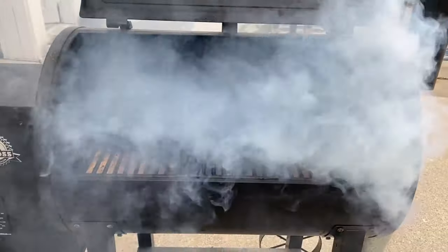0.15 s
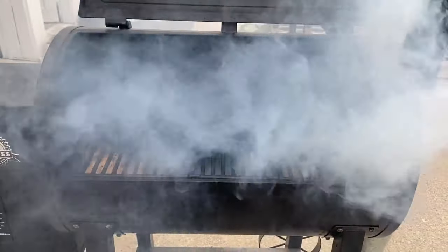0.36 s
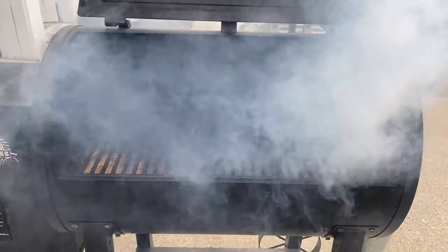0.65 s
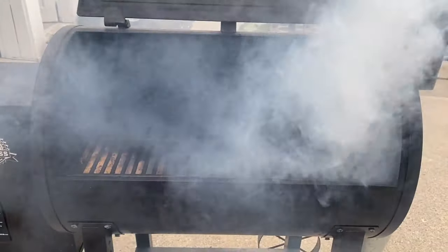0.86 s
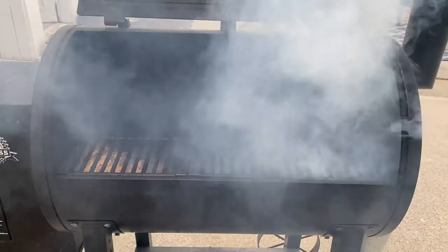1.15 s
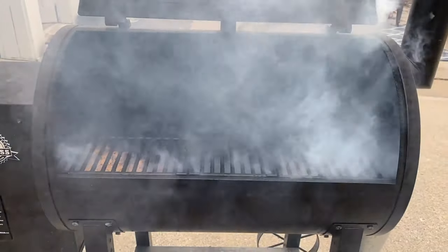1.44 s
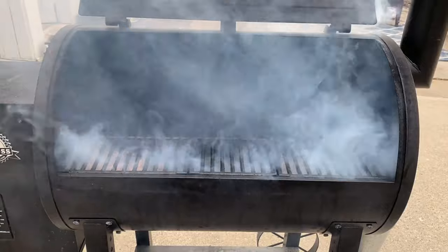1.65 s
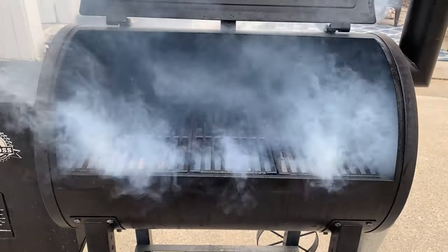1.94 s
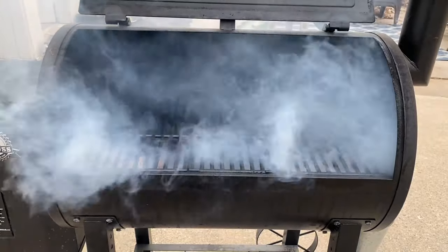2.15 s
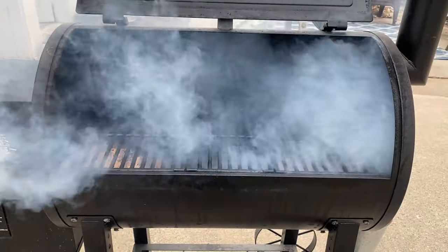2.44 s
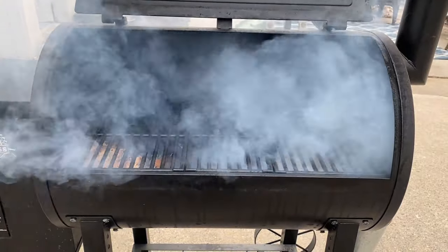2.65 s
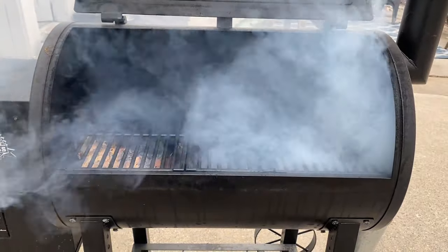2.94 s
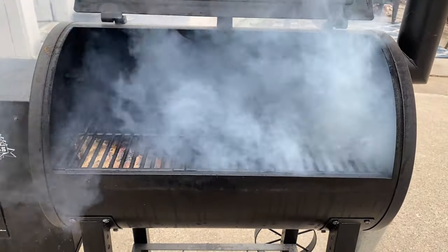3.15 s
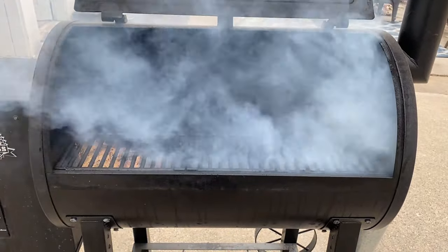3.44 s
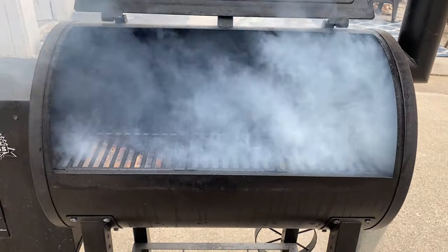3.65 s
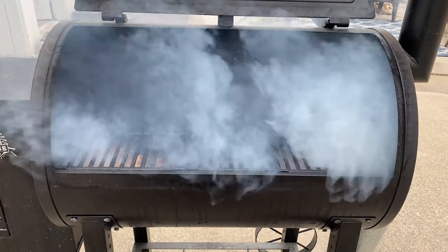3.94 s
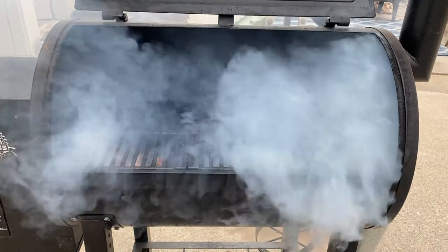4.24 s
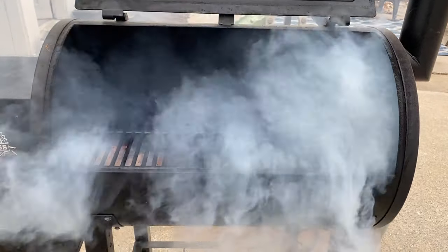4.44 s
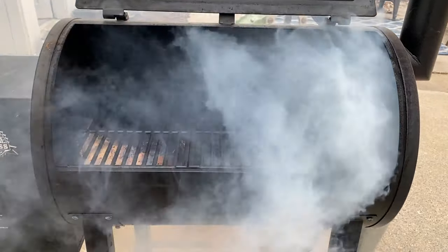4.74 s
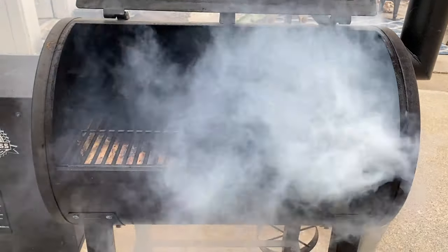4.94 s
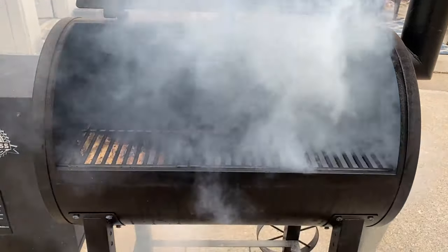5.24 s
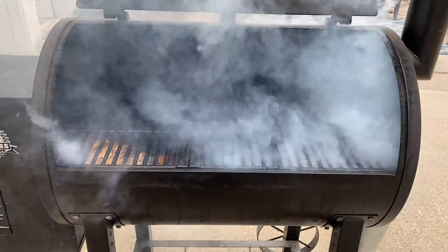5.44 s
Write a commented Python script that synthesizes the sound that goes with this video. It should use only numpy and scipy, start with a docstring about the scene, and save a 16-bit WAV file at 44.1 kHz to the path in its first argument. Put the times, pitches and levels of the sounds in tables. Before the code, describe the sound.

A phone close to a smoking barrel grill picks up constant motor hum and airy, metallic-coloured fan rush, leaning slightly left. The fire rumbles low. It begins undisturbed; then wind buffets the microphone with deep lumps and soft knocks, and a narrow breezy hiss swells briefly early and again near the end.

```python
"""A pellet grill runs outdoors with its lid open: its motors hum, drone and whine as stacks of sine tones.
The fan's air rushes through the fire pot and the steel barrel: noise lifted at the barrel's resonances.
The fire roars as low, flickering noise, and a thin narrow hiss swells now and then.
A breeze rises after a second or so and buffets the phone's microphone: lumpy low noise for the rumble,
and short swings of pressure for the dull thumps."""
import sys
import numpy as np
from scipy import signal
from scipy.fft import rfft, irfft, next_fast_len
from scipy.io import wavfile
from scipy.ndimage import map_coordinates

SR = 44100
rng = np.random.default_rng(int(sys.argv[2]) if len(sys.argv) > 2 else 0)


def pcm_store(signal):
    """Save signal as 16-bit PCM."""
    levels = np.round(np.clip(np.atleast_2d(signal), -1, 1) * 32767)
    wavfile.write(sys.argv[1], SR, levels.astype(np.int16).T)


N = 247074
TIME = np.arange(N) / SR
FREQ = np.maximum(np.fft.rfftfreq(N, 1 / SR), 1)  # kept above 0 Hz so that its logarithm exists

MAINS_HUM_HZ, FAN_HZ, SHAFT_HZ, BLADES = 119.9, 80.3, 55.371, 7

# how the sound reaches the two microphone ports:
# (frequency [Hz], likeness [0-1], left minus right [dB])
PORT_BALANCE = [(100, .9, 0), (250, .9, -.6), (380, .72, -.3), (600, .9, 3.3), (950, .9, 4.2),
                (1250, .8, .3), (1900, .45, 1.6), (3000, .6, 2), (4500, .8, .3), (9000, .55, 0)]


def motors(waver=0.00501, ripple_depth=0.15):
    """Hum locked to the mains that swells and sags, a wavering fan drone and a clean blade whine."""
    # magnetic hum: (multiple of the mains hum, level [dB])
    hum_tones = [(1, -33), (2, -38), (4, -65)]
    # drone of the fan: (multiple of the fan rate, level [dB])
    drone_tones = [(3, -46.5), (6, -52.5), (7, -56), (9, -61), (12, -57.5), (13, -60)]
    # whine of the blades: (multiple of the blade rate, level against the strongest [dB])
    whine_tones = [(2, -14), (3, -11), (4, 0), (12, -27)]

    hum = partials(np.full(N, MAINS_HUM_HZ), hum_tones, flutter_db=1.7, flutter_rate=15.6)
    hum = hum * undb(1.2 * walk(5))

    fan_hz = FAN_HZ * (1 + waver * walk(6.3))
    drone = partials(fan_hz, drone_tones, flutter_db=1.0, flutter_rate=13.5)

    shaft_hz = SHAFT_HZ * (1 + 0.000366 * walk(0.67))
    # the whine gets a little quieter as the breeze sets in
    sink_at_s, sink_length_s, sink_db = 1.46, 0.1, -2.5
    sunk = .5 + .5 * np.tanh((TIME - sink_at_s) / sink_length_s)
    whine_db = -53.5 + sink_db * sunk + 0.2 * walk(0.75)
    whine = partials(BLADES * shaft_hz, whine_tones, flutter_db=1.14, flutter_rate=17) * undb(whine_db)

    # the torque ripples with the mains and gives the whine side tones
    ripple = 1 + ripple_depth * np.sin(2 * np.pi * MAINS_HUM_HZ * TIME)
    return hum + drone + (whine + bearing(shaft_hz)) * ripple


def bearing(shaft_hz, db=-64, corner_hz=1100, size=2048):
    """The same faint roughness comes round at every turn of the shaft: a fine, even buzz."""
    ratio = np.arange(size // 2 + 1) * SHAFT_HZ / corner_hz
    strength = ratio ** 2 / (1 + ratio ** 2) ** 2  # strongest around the corner
    one_turn = irfft(np.exp(2j * np.pi * rng.random(len(ratio))) * strength)
    turns = np.cumsum(shaft_hz) / SR
    return undb(db) * np.interp(turns % 1 * size, np.arange(size), one_turn / one_turn.std())


def partials(hz, rows, flutter_db, flutter_rate):
    """Multiples of a running speed; the level of each one flutters quickly by itself."""
    phase = 2 * np.pi * np.cumsum(hz) / SR
    total = 0
    for multiple, db in rows:
        level = np.sqrt(2) * undb(db + flutter_db * walk(flutter_rate))
        total = total + level * np.sin(round(multiple) * phase + rng.uniform(0, 2 * np.pi))
    return total


def blown_air(drift=0.00099, drift_rate=3):
    """Turbulence from the fan rings the barrel; hot and cool air mix, so its tones drift and flutter."""
    # rush of the blown air before the barrel lifts it: (frequency [Hz], level [dB per Hz])
    rush_colour = [(15, -115), (150, -89), (430, -76), (620, -69.5), (700, -78), (1100, -79), (1350, -88),
                   (1700, -91), (2400, -88.5), (2900, -89.5), (3300, -95.5), (4900, -95), (5350, -101.5),
                   (6600, -100.5), (7600, -110), (11000, -109.5), (15000, -115)]
    # resonances of barrel and duct: (frequency [Hz], width [Hz], lift [dB])
    resonances = [(481, 53, 8.5), (758.3, 42, 8.5), (929, 73, 5), (1037, 79, 5.5), (1236, 64, 7),
                  (1500, 53, 7), (2360, 82, 6.5), (2540, 75, 1), (2850, 54, 4.5), (3019, 40, 8.5),
                  (3080, 66, 7.5), (3870, 210, 3.5), (4180, 54, 7.5), (5100, 92, 5)]

    lift_db = sum(db * np.exp(-2 * ((FREQ - hz) / width) ** 2) for hz, width, db in resonances)
    steady = two_ports(colour(rush_colour) + lift_db)
    # reading the noise slightly faster and slower makes its resonances drift
    place = np.cumsum(1 + drift * walk(drift_rate))
    rush = [map_coordinates(port, [place], order=3, mode="mirror") for port in steady]
    return fluttering(np.array(rush))


def fluttering(x):
    """Each band of a sound rises and falls by itself, slowly and with a quicker tremble."""
    # (band centre [Hz], depth of each of the two movements [dB])
    bands = [(480, 1), (680, 1), (1000, .8), (1600, .7), (2350, 1), (3050, 1), (4200, .45)]
    spectrum, out = rfft(x), 0
    centres = [hz for hz, _ in bands]
    # each share is 1 at its own centre and 0 at the others, so the bands add up to the whole
    for (_, depth_db), share in zip(bands, np.eye(len(bands))):
        band = irfft(spectrum * colour(list(zip(centres, share))), N)
        out = out + band * undb(depth_db * (walk(4) + walk(20)))
    return out


def fire():
    """The flame in the pot roars low and flickers."""
    # roar of the fire pot before the flame's changes: (frequency [Hz], level [dB per Hz])
    roar_colour = [(15, -112), (28, -107), (50, -75), (80, -71.5), (108, -54.5), (135, -54.5), (165, -61),
                   (200, -52), (230, -54.7), (270, -59), (310, -69.5), (400, -78.5), (3000, -160)]
    # the flame burns a little higher at first: (time [s], level [dB])
    flame_height = [(0, 1), (0.45, 2), (1.0, 0), (3.6, -1), (5.6, -.5)]
    flicker_db = 1.0 * walk(12.6)
    return two_ports(colour(roar_colour)) * undb(curve(flame_height) + flicker_db)


def sigh(centre_hz=2090, width_hz=230, skirt_hz=2500, skirt_width_hz=450, skirt_db=-15, rest_db=-72):
    """A narrow, breezy hiss with a softer upper skirt swells above a faint resting level."""
    # swells of the hiss: (time of the crest [s], level [dB], half length [s])
    crests = [(1.62, -62, 0.38), (4.6, -56.8, 0.24), (4.97, -55.5, 0.21)]
    peak = 1 / (1 + ((FREQ - centre_hz) / width_hz) ** 2)
    skirt = undb(skirt_db) / (1 + ((FREQ - skirt_hz) / skirt_width_hz) ** 4)
    hiss = two_ports(20 * np.log10(peak + skirt))
    strength = undb(rest_db) + sum(undb(db) * swell(at, half) for at, db, half in crests)
    return hiss / hiss.std() * strength * undb(walk(24))


def swell(at, half_length):
    """A smooth rise and fall around a moment, 1 at the crest."""
    return np.exp(-((TIME - at) / half_length) ** 2)


def breeze(trim_db=2.76, apart_db=-15):
    """Turbulent pressure on the microphone, in lumps, never quite the same at both ports."""
    # strength of the breeze before the trim: (time [s], level [dB])
    gusts = [(0, -80), (1.26, -72), (1.32, -49), (1.8, -35), (2.07, -41.5), (2.6, -32.5), (3.0, -38.5),
             (3.35, -37), (3.8, -39), (4.25, -30.5), (4.45, -33), (4.93, -31.5), (5.04, -34.5), (5.28, -40),
             (5.6, -41)]
    # balance of its rumble: (frequency [Hz], relative level [dB])
    rumble_colour = [(16, -31), (30, -15), (48, 0), (75, 0), (115, -3), (160, -8), (230, -19), (330, -23),
                     (500, -33), (4000, -115)]

    rumble = two_ports(colour(rumble_colour))
    # a little extra noise pushes the two ports in opposite directions
    difference = irfft(white() * undb(colour(rumble_colour)), N) * np.array([[1], [-1]])
    rumble = rumble + undb(apart_db) * difference
    lumps_db = 3.1 * walk(11)
    return rumble / rumble.std() * undb(curve(gusts) + trim_db + lumps_db)


def thumps(flurry_rise_s=0.0063, uneven_db=1.5):
    """Each strong eddy is a brief slap, a flurry of torn air and a slower push, uneven at the ports."""
    # single eddies:
    # (time [s], push level [dB], push pitch [Hz], slap level [dB], slap pitch [Hz])
    eddies = [(1.725, -36, 62, -42, 260), (1.831, -16.5, 100, -29, 300), (2.177, -20, 83, -34, 260),
              (2.28, -14.5, 91, -29, 285), (2.367, -17, 109, -19, 370), (2.381, -21, 104, -43, 340),
              (2.419, -21, 149, -32, 334), (2.551, -20, 74.6, -29, 324), (2.588, -22, 68, -46, 260),
              (2.634, -24, 79, -45, 260), (2.764, -16.5, 121, -43, 280), (2.867, -18.5, 80, -46, 260),
              (3.031, -23, 58, -49, 260), (3.109, -25, 63.4, -34, 300), (3.548, -24, 67.5, -42, 260),
              (3.768, -20, 66, -50, 260), (3.942, -22, 95, -24, 410), (3.954, -11.5, 92, -28.5, 480),
              (3.981, -11.5, 78, -25.5, 396), (4.064, -18.5, 79, -36, 278), (4.124, -18, 133, -31.5, 330),
              (4.209, -22, 70, -49, 260), (4.287, -19, 106, -44, 260), (4.363, -22, 67.5, -44, 260),
              (4.56, -15, 68, -29, 260), (4.652, -17, 122, -38, 259), (4.682, -12.5, 86, -38, 260),
              (4.767, -11.5, 139, -23.5, 320), (4.801, -17.5, 84, -29, 300), (4.893, -19, 85, -39, 260),
              (4.919, -15.5, 158, -28, 302), (4.937, -20, 61, -43, 260), (5.563, -27, 71.5, -45, 260)]
    # balance of the torn air behind each slap: (frequency [Hz], relative level [dB])
    flurry_colour = [(60, -14), (170, 0), (330, -1), (550, -7), (750, -16), (2500, -70)]
    swell_cycles = 0.84  # cycles that a push takes to swell
    slap_rise_s = 0.0028
    flurry_db = -8.5  # against the slap

    out, torn = np.zeros((2, N)), 0
    flurry = two_ports(colour(flurry_colour))
    leans = rng.standard_normal(len(eddies))
    for (at, push_db, push_hz, slap_db, slap_hz), lean in zip(eddies, leans):
        t = np.maximum(TIME - at, 0)
        push = undb(push_db) * puff(t, push_hz, swell_cycles / push_hz)
        slap = undb(slap_db) * puff(t, slap_hz, slap_rise_s)
        out += (push + slap) * undb(uneven_db * lean * np.array([[1], [-1]]))
        torn = torn + undb(slap_db + flurry_db) * surge(t, flurry_rise_s)
    # air has no hard edge, and the microphone passes no steady pressure
    soft_edges = signal.butter(3, [33, 900], "bandpass", fs=SR, output="sos")
    return signal.sosfilt(soft_edges, out + torn * flurry / flurry.std())


def puff(t, hz, rise_s):
    """A short swing of pressure."""
    return surge(t, rise_s) * np.sin(2 * np.pi * hz * t)


def surge(t, rise_s):
    """A strength that swells to 1 and dies away."""
    age = np.minimum(t / rise_s, 20)
    return age ** 2 * np.exp(2 * (1 - age))


def from_hopper(x):
    """Sound from the left reaches the left port earlier and, at most pitches, a little louder."""
    # the hopper stands to the left: (frequency [Hz], lead of the left port [radians])
    left_lead = [(380, 0), (500, .55), (1000, .9), (1300, 1.6), (1550, .62), (2200, .8), (3100, 1.7),
                 (3900, 0)]
    # each port takes half of the difference
    tilt = undb(colour(PORT_BALANCE, axis=2) / 2) * np.exp(.5j * colour(left_lead))
    return irfft(rfft(x) * np.array([tilt, 1 / tilt]), N)


def two_ports(db):
    """Noise of a given spectrum, partly shared by the two microphone ports."""
    alike = np.clip(colour(PORT_BALANCE), 0, 1)
    mid = np.sqrt((1 + alike) / 2) * white()
    side = np.sqrt((1 - alike) / 2) * white()
    return irfft(undb(db) * np.array([mid + side, mid - side]), N)


def white():
    """Spectrum of white noise at 0 dB per Hz."""
    return rfft(rng.standard_normal(N)) * np.sqrt(SR / 2)


def walk(rate):
    """Smooth chance with spread 1 that changes about rate times a second."""
    size = next_fast_len(N, True)
    smoothing = np.exp(-.5 * (np.fft.rfftfreq(size, 1 / SR) / rate) ** 2)
    y = irfft(rfft(rng.standard_normal(size)) * smoothing, size)[:N]
    return (y - y.mean()) / y.std()


def colour(rows, axis=1):
    """One column of a table joined on a log-frequency axis."""
    table = np.transpose(rows)
    return np.interp(np.log(FREQ), np.log(table[0]), table[axis])


def curve(rows):
    """A control joined by straight lines in time."""
    return np.interp(TIME, *np.transpose(rows))


def undb(db):
    """Decibels to gain."""
    return 10 ** (np.asarray(db) / 20)


def scene():
    """The grill on the left, the wind on the phone itself."""
    grill = motors() + blown_air() + fire() + sigh()
    return from_hopper(grill) + breeze() + thumps()


def record(dry):
    """The phone cuts the top with a steep low-pass filter."""
    top_hz = 15800
    return signal.sosfilt(signal.ellip(8, .2, 70, top_hz, fs=SR, output="sos"), dry)


dry = scene()
out = record(dry)
pcm_store(out)
```